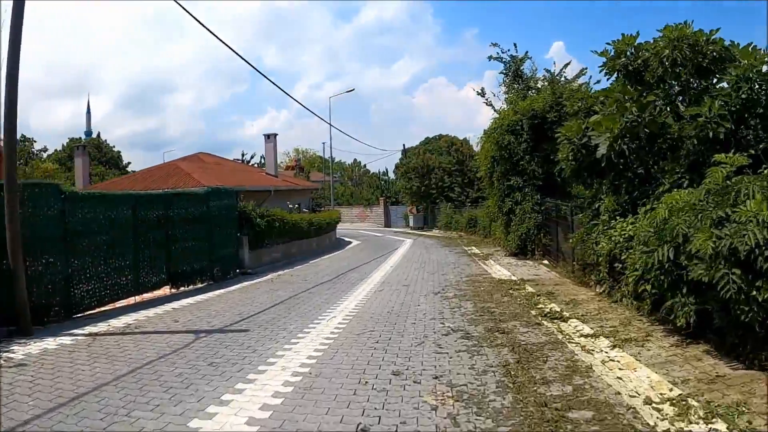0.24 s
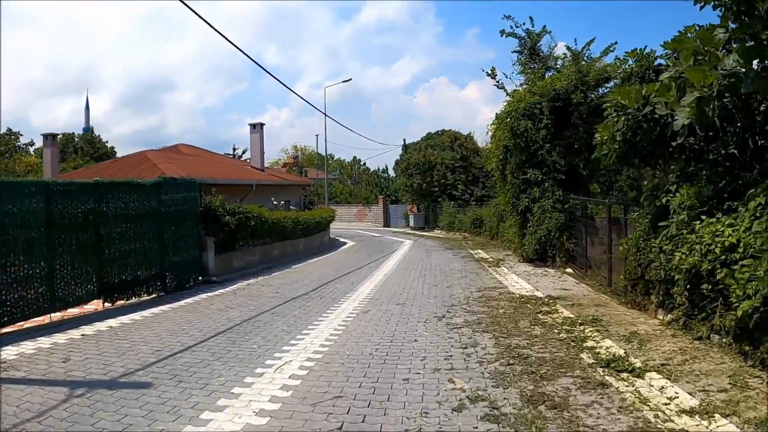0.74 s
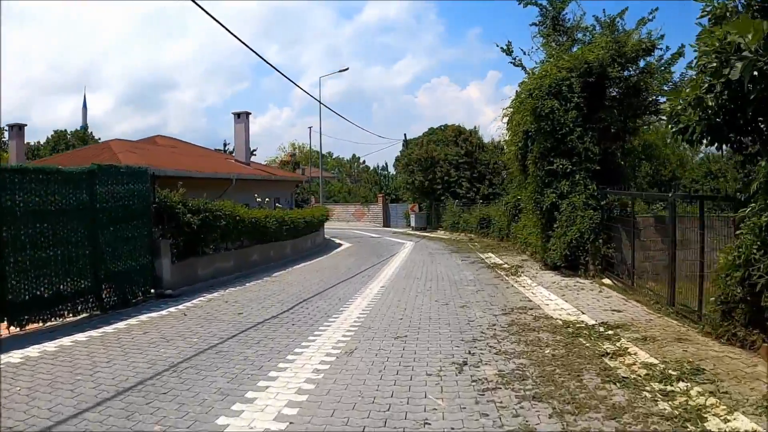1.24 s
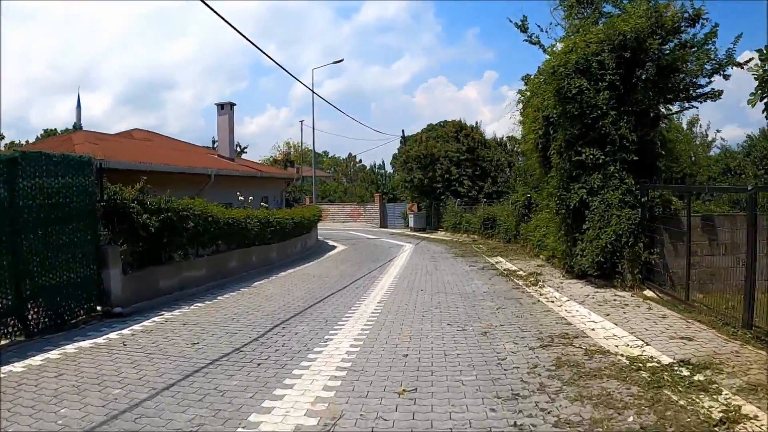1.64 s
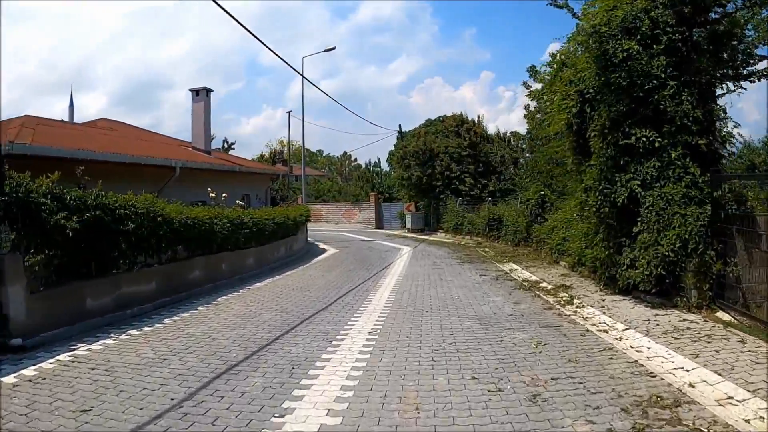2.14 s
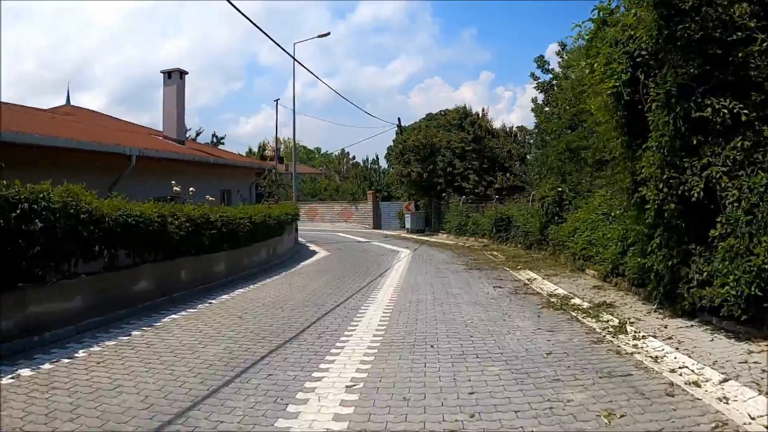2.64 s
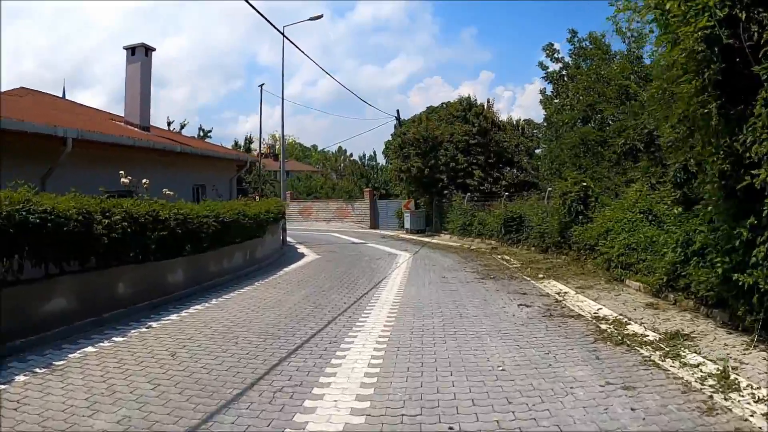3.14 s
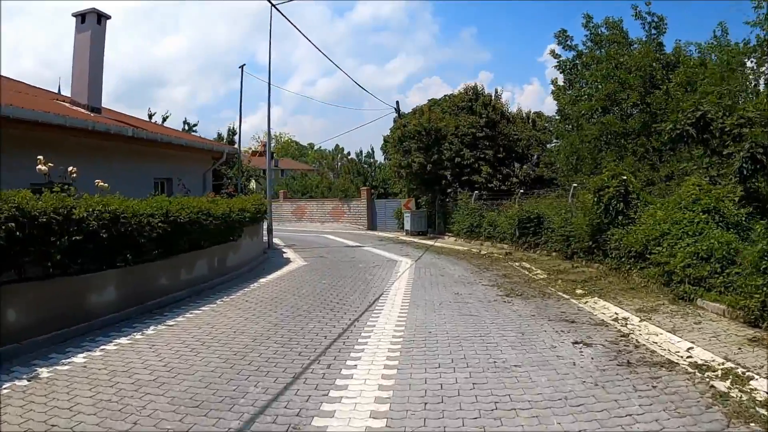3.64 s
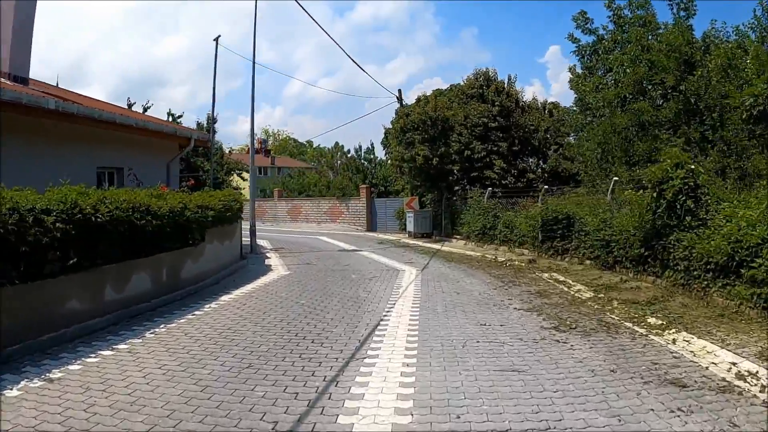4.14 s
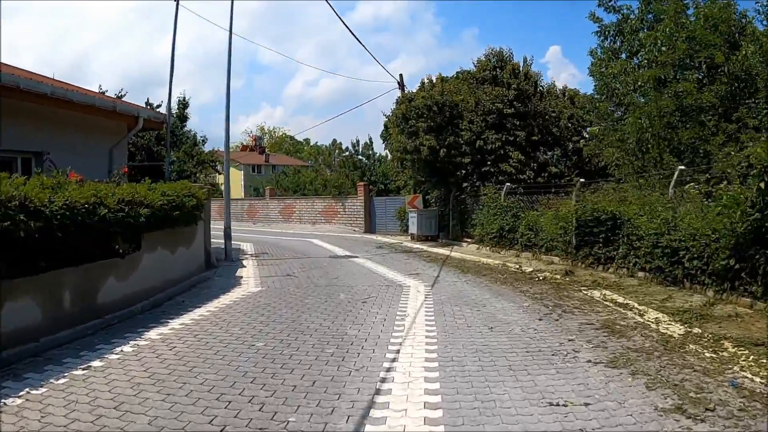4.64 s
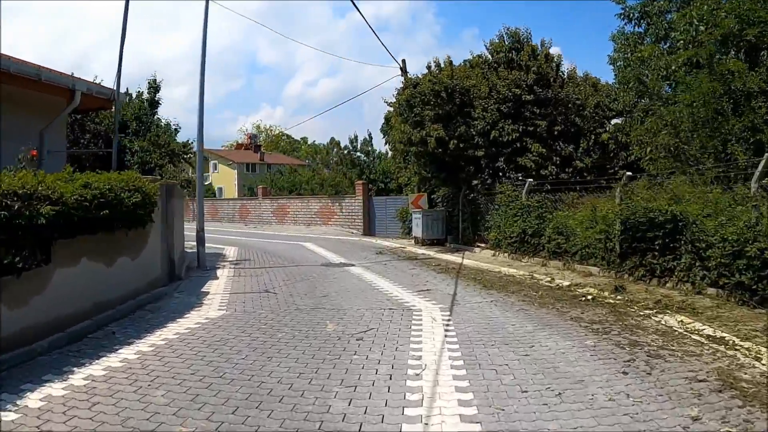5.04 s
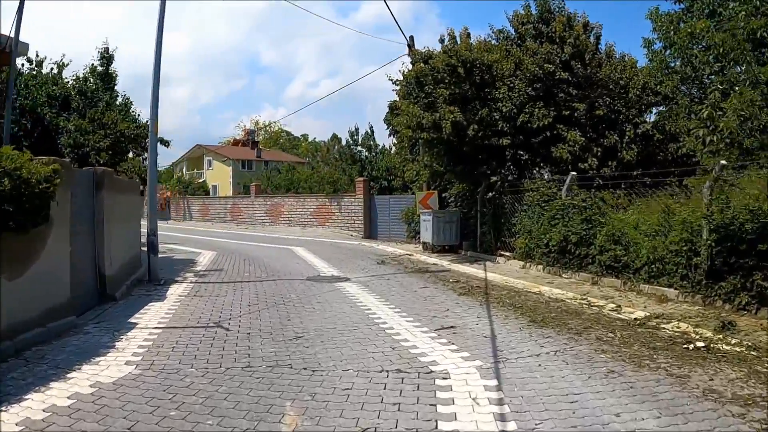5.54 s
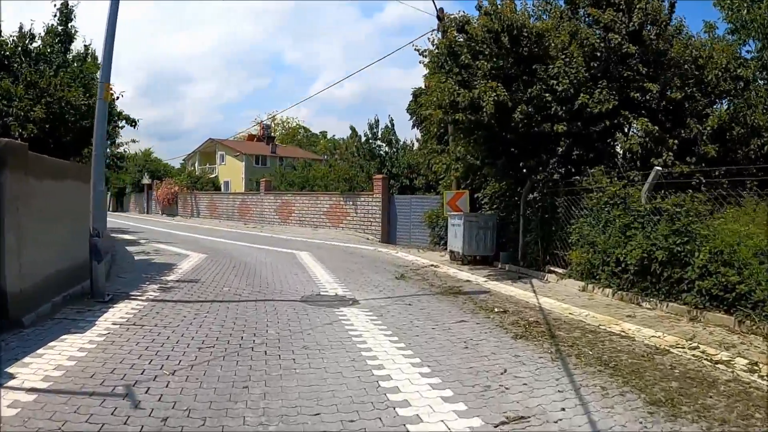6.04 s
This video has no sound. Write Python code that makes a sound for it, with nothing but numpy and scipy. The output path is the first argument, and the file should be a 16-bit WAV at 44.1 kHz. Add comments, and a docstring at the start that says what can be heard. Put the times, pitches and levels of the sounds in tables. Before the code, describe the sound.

A slow vehicle rolls along a stone-paved village street, heard from inside. The engine hums at a steady speed beneath a deep tyre rumble and the bouncing of the body. Loose trim knocks and ticks among dull thuds and gritty crunches, easing in the middle and growing busier later. Sparrows chirp very faintly outside. Near the end something rubs with a brief throbbing squeal.

```python
"""Slow ride over village paving

Inside a slow vehicle, the engine hums at a steady speed under the rumble of tyres on stone joints.
The body bounces and thuds, loose trim knocks and ticks, with gritty crunches in between. Sparrows
chirp outside, and near the bend something rubs, sticking and slipping so that it sings in throbs."""
import sys
import numpy as np
from scipy import signal
from scipy.fft import rfft, irfft
from scipy.io import wavfile
from scipy.ndimage import uniform_filter1d

SR = 44100
rng = np.random.default_rng(int(sys.argv[2]) if len(sys.argv) > 2 else 0)


def inscribe(sig):
    """Save sig as 16-bit PCM at rate SR to the path in sys.argv[1].

    A 1-D sig is mono; a 2-D sig holds one channel per row.
    Samples are clipped to [-1, 1] before scaling.
    """
    pcm = np.round(np.clip(np.atleast_2d(sig).T, -1, 1) * 32767)
    wavfile.write(sys.argv[1], SR, pcm.astype(np.int16))


N = 276948
TIME = np.arange(N) / SR


def gain_of(db):
    """Decibels to a factor."""
    return 10 ** (np.asarray(db) / 20)


def unit_rms(x):
    """Scales to rms 1."""
    return x / np.sqrt(np.mean(x ** 2) + 1e-20)


def peak_at(db, x):
    """Scales to a peak level."""
    return gain_of(db) * x / abs(x).max()


def curves(rows, t=TIME):
    """The columns of a table as fader moves: straight lines in time."""
    s, *columns = np.transpose(rows)
    return [np.interp(t, s, c) for c in columns]


def add(mix, s, sound):
    """Lays a sound into the mix at s seconds."""
    part = mix[round(s * SR):][:len(sound)]
    part += sound[:len(part)]


def wander(top_hz):
    """A random drift of rms 1, moving at rates up to top_hz."""
    t, rates = TIME[::64], np.geomspace(top_hz / 12, top_hz, 12)
    drift = sum(np.sin(2 * np.pi * (f * t + rng.random())) / np.sqrt(f) for f in rates)
    return np.interp(TIME, t, unit_rms(drift))


def coloured(x, eq):
    """Applies an EQ curve, cuts all beyond its ends and scales to rms 1."""
    hz = np.fft.rfftfreq(N, 1 / SR)
    f, db = np.transpose(eq)
    shape = gain_of(np.interp(np.log(hz + 1), np.log(f + 1), db)) * (hz > f[0]) * (hz < f[-1])
    return unit_rms(irfft(rfft(x) * shape, N))


def swell(s, length):
    """One smooth rise and fall centred on s."""
    return np.cos(np.pi * np.clip((TIME - s) / length, -.5, .5)) ** 2


def ring(hz, t, t60):
    """One mode, dying by 60 dB in t60 seconds."""
    return gain_of(-60 * t / t60) * np.sin(2 * np.pi * hz * t)


# sparrow calls: t/s, length/s, start f/Hz, middle f/Hz, end f/Hz, fundamental/dB, octave/dB
CHIRPS = [(.43, 0.016, 4770, 4330, 3900, -72, -99), (1.91, 0.048, 3980, 3850, 3700, -88, -89),
          (2.243, .02, 3900, 3800, 3750, -82, -86), (2.258, 0.046, 3010, 2950, 2930, -85, -84),
          (2.263, .013, 3450, 3420, 3450, -93, -82), (2.3, 0.015, 3730, 3980, 4250, -71.5, -96),
          (2.302, 0.038, 3000, 2940, 2900, -89, -87), (3.129, 0.12, 4900, 4630, 4480, -85, -115),
          (3.262, 0.014, 3200, 3700, 4350, -92, -85), (3.276, .014, 4800, 4900, 4880, -88, -90),
          (3.288, .012, 4500, 3930, 3500, -90, -80), (3.298, 0.012, 3700, 3750, 3350, -79, -77),
          (3.309, 0.011, 3350, 3420, 3600, -86, -71), (3.312, 0.0099, 3880, 4000, 4300, -95, -86),
          (3.322, .014, 3500, 3920, 4200, -90, -83), (3.337, 0.017, 2900, 3150, 3700, -80, -82),
          (3.648, 0.024, 2900, 3320, 4680, -88, -82), (3.661, 0.024, 4650, 5020, 4570, -71.5, -91),
          (3.682, 0.022, 4000, 3860, 3830, -75.5, -84), (3.696, 0.021, 3470, 3130, 3450, -81, -68.5),
          (3.718, .03, 3150, 2900, 3470, -91, -82), (3.73, 0.034, 2770, 3320, 4100, -72.5, -89),
          (3.752, .012, 4000, 3600, 3100, -76, -99), (3.94, 0.036, 6030, 5670, 5300, -85, -99)]


def sparrows():
    """Gliding whistles with overtones, slightly hoarse, smeared by echoes off the walls."""
    out = np.zeros(N)
    for s, length, *glide_hz, first_db, octave_db in CHIRPS:
        u = np.linspace(0, 1, round(length * SR))
        hoarse = 1 + .17 * uniform_filter1d(rng.standard_normal(len(u)), 30)
        phase = 2 * np.pi * np.cumsum(np.interp(u, (0, .5, 1), glide_hz) * hoarse) / SR
        overtones = np.sin(2 * phase) + gain_of(-19) * np.sin(3 * phase)
        tone = gain_of(first_db) * np.sin(phase) + gain_of(octave_db) * overtones
        add(out, s, np.sqrt(2) * tone * np.sin(np.pi * u) ** 0.52)
    t, echo_t60_s = np.arange(5000) / SR, .12
    echoes = rng.standard_normal(len(t)) * gain_of(-60 * t / echo_t60_s)
    return out + gain_of(-5.5) * signal.oaconvolve(out, echoes / np.linalg.norm(echoes))[:N]


# hum as the cabin colours it: t/s, level/dB of orders 7, 8, 9 and 19, offset/dB of other high orders
HUM_FADERS = [(0, -72, -50, -71, -67, 6), (.4, -73, -52.5, -68.5, -60.5, 4),
              (.8, -61, -53, -58.5, -62.5, 0.5), (1.2, -58, -55, -65, -88, -2.5),
              (1.6, -61.5, -62, -60, -68.5, -3.5), (2.0, -59, -65.5, -62.5, -73.5, 0.5),
              (2.4, -53, -61.5, -67, -85, -2), (2.8, -54.5, -60.5, -65.5, -74, -2),
              (3.2, -56.5, -57.5, -73.5, -68.5, -3.5), (3.6, -58.5, -59.5, -63, -72.5, -7.5),
              (4.0, -76, -67.5, -80, -73.5, -4), (4.4, -71.5, -76, -68.5, -90, -6.5),
              (5.2, -70.5, -71.5, -72, -84.5, -4.5), (6.28, -67.5, -70.5, -74.5, -77, -7)]
# the rest of the hum: multiple of the firing rate, level/dB before its offset
OTHER_ORDERS = [(4, -61), (5, -63.5), (6, -61.5), (10, -73.5), (12, -70), (13, -73.5), (15, -72),
                (16, -74.5), (17, -81.5), (18, -80.5), (20, -75.5), (21, -73), (22, -73.5), (23, -71.5),
                (24, -71.5), (26, -90), (27, -77), (28, -77.5), (30, -81)]


def engine():
    """Orders of a steady firing rate as clean tones, each wavering as the cabin shakes."""
    firing_hz, lead_orders, low_offset_db = 24.4, (7, 8, 9, 19), -4
    *lead_db, high_offset_db = curves(HUM_FADERS)
    orders = list(zip(lead_orders, lead_db))
    orders += [(k, db + (high_offset_db if k > 7 else low_offset_db)) for k, db in OTHER_ORDERS]
    turns = firing_hz * TIME + .011 * wander(9)
    out = np.zeros(N)
    for order, db in orders:
        flutter_db = 2.6 * wander(22)
        swell_db = (1.2 if order in lead_orders else 2.4) * wander(4)
        out += gain_of(db + flutter_db + swell_db) * np.sin(2 * np.pi * (order * turns + rng.random()))
    return np.sqrt(2) * out


# road bed: t/s, then level/dB of shake (before trim), drum, roar, dull rattle, bright rattle, hiss
ROAD_FADERS = [(0, -41, -49, -55.5, -65, -70, -72.5), (.3, -53, -53, -64.5, -65, -70.5, -72.5),
               (.55, -43, -49.5, -60.5, -67, -75.5, -74), (.84, -43.5, -43.5, -63, -66.5, -71, -71),
               (1.0, -43, -47, -65.5, -70, -72, -75), (1.38, -48.5, -53, -63, -70.5, -77.5, -77.5),
               (1.9, -49, -48, -64, -71.5, -78, -80.5), (2.6, -41, -49, -65, -71, -78.5, -79.5),
               (3.2, -42, -48.5, -65, -74.5, -82.5, -80.5), (3.6, -43, -52.5, -64, -73.5, -84, -80),
               (3.92, -41.5, -46, -64, -76, -79, -79), (4.25, -44, -44.5, -60, -73.5, -81.5, -81),
               (4.58, -47, -49.5, -63.5, -72, -79.5, -81), (4.9, -40, -44.5, -60, -72.5, -78, -78),
               (5.25, -42, -50, -61, -71, -73.5, -74), (5.5, -42.5, -41.5, -60, -77, -74.5, -78),
               (5.8, -41, -47, -61.5, -74.5, -81, -79.5), (6.1, -43, -46, -66.5, -79, -81.5, -79.5),
               (6.28, -36, -54, -58.5, -72, -71.5, -80.5)]
# bumps in the paving: centre t/s, length/s, body ring level/dB, tyre drum level/dB, ring f/Hz
BUMPS = [(0, 0.12, -54, -68, 45.0), (0.242, 0.16, -38, -43.5, 45.1), (0.425, 0.21, -33.5, -46, 43.96),
         (0.594, 0.07, -37.5, -53, 44.26), (0.753, 0.16, -39.5, -52.5, 45.2),
         (0.898, 0.26, -36, -51, 40.96), (1.093, 0.26, -34.5, -40, 44.7), (1.21, 0.12, -31, -43, 38.02),
         (1.328, 0.11, -42.5, -47, 44.0), (1.498, 0.21, -39.5, -43.5, 36.0),
         (1.698, 0.26, -38.5, -43, 40.0), (1.897, 0.25, -39.5, -55, 39.0), (2.048, 0.11, -39, -50, 45.04),
         (2.219, 0.1, -37.5, -51, 46.2), (2.368, 0.14, -45, -43.5, 44.05), (2.82, 0.13, -39.5, -60, 45.0),
         (3, 0.22, -51, -42, 44.96), (3.347, 0.28, -41, -47, 50.6), (3.478, 0.17, -45.5, -46.5, 39.86),
         (3.663, 0.17, -40.5, -46.5, 30.93), (4.072, 0.4, -40, -42, 54.26), (4.399, 0.3, -35, -42, 37.98),
         (4.694, 0.2, -36, -44.5, 37.24), (4.789, 0.1, -38, -49, 24.07), (4.931, 0.19, -41, -42, 30.07),
         (5.055, 0.12, -45, -39.5, 41.85), (5.144, 0.057, -39, -39.5, 35.0),
         (5.219, 0.19, -51, -40.5, 65.2), (5.395, 0.21, -44, -45.5, 50.16),
         (5.559, 0.047, -38.5, -56, 40.74), (5.645, 0.043, -39.5, -57, 30.0),
         (5.993, 0.21, -39, -42.5, 41.1), (6.13, 0.054, -44, -64, 48.0), (6.27, 0.21, -36, -42, 38)]
# EQ of the deep shake: f/Hz, gain/dB
SHAKE_EQ = [(14, -24), (22, -9.5), (30, -1), (36, -2.5), (42, 4.5), (49, -4.5), (60, -6), (70, -5.5),
            (90, -35)]


def body_shake():
    """The body bounces on its tyres: compressed sub rumble, and a low wavering ring at each bump."""
    rumble = coloured(rng.standard_normal(N), SHAKE_EQ)
    compressed = rumble / (uniform_filter1d(rumble ** 2, 2600) + 0.047) ** 0.38
    out = gain_of(curves(ROAD_FADERS)[0] - 0.5) * unit_rms(compressed)
    waver = 0.17 * wander(8.3)
    for s, length, ring_db, _, hz in BUMPS:
        tone = np.sin(2 * np.pi * (hz * TIME + waver + rng.random()))
        out += np.sqrt(2) * gain_of(ring_db) * swell(s, length) * tone
    return out


# EQs of tyre drum, cabin roar, dull rattle, bright rattle and hiss: f/Hz, gain/dB
DRUM_EQ = [(50, -31), (65, 1.5), (125, -2.5), (150, -13), (215, -18.5), (250, -26), (300, -48.5)]
ROAR_EQ = [(130, -29.5), (220, -1), (334, -8.5), (383, -5), (482, -13), (565, -10), (795, -19.5),
           (900, -29.5), (1170, -60.5), (1980, -120)]
DULL_EQ = [(470, -42), (800, -10), (950, -3.5), (1040, -5.5), (1140, -1), (1550, -7.5), (2020, -41),
           (3410, -120)]
BRIGHT_EQ = [(910, -26.5), (1550, -4), (1690, 1), (1780, 3), (1980, 0.5), (2500, -9.5), (3250, -39.5),
             (5500, -120)]
HISS_EQ = [(1350, -32), (2300, -3.5), (2530, -7), (3170, -4.5), (5390, -12), (5880, -13), (6860, -17),
           (7700, -17), (10800, -32), (13100, -32.5), (15600, -37)]


def road_noise():
    """Tyres on stone: bumps swell the drum and roar, joints jolt all layers above the drum together."""
    _, drum_db, roar_db, dull_db, bright_db, hiss_db = curves(ROAD_FADERS)
    bumps = sum(gain_of(db) * swell(s, length) for s, length, _, db, _ in BUMPS)
    joints = stone_joints(per_s=160, spread_db=1.5, smear_s=0.008)
    noise = rng.standard_normal((5, N))
    drum = np.hypot(gain_of(drum_db), bumps) * coloured(noise[0], DRUM_EQ)
    roar_gain = np.hypot(gain_of(roar_db), gain_of(-18.5) * bumps)
    roar = roar_gain * coloured(noise[1] + 0.33 * joints, ROAR_EQ)
    dull = gain_of(dull_db) * coloured(noise[2] + 0.45 * joints, DULL_EQ)
    bright = gain_of(bright_db) * coloured(noise[3] + 0.55 * joints, BRIGHT_EQ)
    hiss = gain_of(hiss_db) * coloured(noise[4] + 0.88 * joints, HISS_EQ)
    return drum + roar + dull + bright + hiss


def stone_joints(per_s, spread_db, smear_s):
    """Flickering noise of rms 1 that flares at each random jolt."""
    sizes = gain_of(spread_db * np.minimum(rng.exponential(1, N), 4))
    jolts = sizes * (rng.random(N) < per_s / SR)
    envelope = signal.oaconvolve(jolts, np.exp(-np.arange(2000) / SR / smear_s))[:N]
    return unit_rms(envelope * rng.standard_normal(N))


# crunches and rustles: t/s, length/s, centre f/Hz, width/Hz, rms level/dB before the fades
CRUNCHES = [(0, 0.48, 663, 250, -65), (0.027, 0.24, 1430, 500, -70), (0.498, 0.24, 1280, 250, -67.5),
            (0.629, 0.17, 1330, 220, -65), (0.673, 0.022, 3300, 1500, -65), (.557, .015, 3600, 1800, -72),
            (0.798, 0.018, 3700, 1500, -67), (.828, .1, 3640, 1500, -78), (0.799, 0.29, 1305, 250, -68.5),
            (1.175, 0.037, 1270, 500, -60.5), (1.176, 0.0061, 8450, 9000, -69.5),
            (1.17, 0.097, 7500, 5000, -84), (1.308, 0.069, 2630, 900, -78), (2.218, 0.17, 5500, 4500, -85),
            (2.406, 0.26, 4350, 1800, -83.5), (2.939, 0.018, 2100, 900, -62),
            (2.935, 0.013, 3200, 1000, -65), (2.938, 0.008, 760, 260, -55), (2.934, 0.034, 6000, 5000, -84),
            (2.942, 0.026, 400, 250, -57), (2.953, 0.042, 298, 200, -58),
            (2.999, 0.0053, 3000, 2400, -69.5), (3.219, .18, 4500, 3500, -82.5),
            (3.64, 0.13, 4000, 4000, -79.5), (3.835, 0.0055, 1780, 1000, -62),
            (3.87, 0.0053, 1800, 1210, -64), (3.876, 0.3, 1180, 350, -68), (3.795, 0.38, 3150, 1300, -80),
            (4.746, 0.04, 3200, 1800, -72.5), (4.671, 0.063, 1390, 500, -84),
            (4.961, 0.011, 3300, 1600, -61), (4.989, 0.022, 2120, 600, -69),
            (5.041, 0.0054, 5200, 2500, -74), (5.054, 0.02, 5300, 900, -78),
            (5.081, 0.017, 4200, 3000, -69.5), (5.104, .014, 5500, 1200, -77),
            (5.189, 0.016, 3400, 700, -64), (5.226, 0.03, 3730, 2500, -65), (5.258, 0.08, 1840, 450, -71),
            (5.354, 0.054, 2480, 1200, -65.5), (5.472, 0.057, 5300, 3000, -76),
            (5.682, 0.0043, 7900, 5000, -75), (5.677, 0.073, 2980, 1800, -72.5),
            (5.819, 0.029, 2910, 2220, -60.5), (5.82, 0.045, 6000, 4000, -75),
            (5.868, 0.046, 2980, 2220, -66.5), (5.869, 0.12, 6200, 4000, -81.5),
            (5.889, 0.094, 1416, 300, -60.5), (5.954, 0.039, 690, 200, -54.5),
            (5.934, 0.032, 2200, 2400, -66)]


def crunches():
    """Dense grit of uneven grain size through one broad resonance; long rustles are grainier."""
    out = np.zeros(N)
    for s, length, hz, width, db in CRUNCHES:
        noise, size = rng.standard_normal((2, 30000))[:, :round(length * SR)]
        grain_db = 1.5 if length < 0.12 else 3
        grit = noise * gain_of(grain_db * unit_rms(uniform_filter1d(size, 90)))
        edges_hz = np.clip([hz - width / 2, hz + width / 2], 100, 14000)
        grit = signal.sosfilt(signal.butter(3, edges_hz, "band", fs=SR, output="sos"), grit)
        add(out, s, gain_of(db) * unit_rms(grit) * signal.windows.tukey(len(grit), .6))
    return out


# thin ticks: t/s, peak level/dB, f/Hz
TICKS = [(0.372, -58, 3330), (.678, -52, 3370), (.8026, -52, 3670), (.8565, -57, 3500),
         (1.3556, -56.5, 3000), (4.1, -56.5, 4100), (4.2328, -63, 4400), (4.3534, -61, 3870),
         (4.3959, -61, 4000), (4.444, -58.5, 4170), (4.551, -57, 4030), (4.5955, -63, 4100),
         (4.6494, -58, 4240), (4.6945, -50.5, 4120), (4.787, -58, 3900), (4.838, -59, 4040),
         (4.867, -56, 4000), (4.888, -52.5, 3960), (4.9356, -48.5, 3860), (5.151, -54, 4150),
         (5.201, -51, 3770), (5.214, -45.5, 3160), (5.3034, -55, 4000), (5.365, -51, 2960),
         (5.4151, -60, 4390), (5.463, -52, 4200), (5.543, -56.5, 4200), (5.6087, -63, 3220),
         (5.655, -52, 4080), (5.7005, -47, 4170), (5.753, -58.5, 4320), (5.878, -52, 3060),
         (5.933, -55, 3420), (6.0044, -58, 3920), (6.0498, -54.5, 4120)]


def trim_ticks():
    """Tiny hard contacts: two modes, each time a little different, gone in a few milliseconds."""
    out, t = np.zeros(N), np.arange(600) / SR
    attack = (1 - np.exp(-t / 0.0002)) ** 2
    faint_tick = (rng.uniform(4.5, 4.7), rng.uniform(-76, -70), 3580 * rng.uniform(.86, 1.14))
    for s, db, hz in TICKS + [faint_tick]:
        low = rng.uniform(.3, .8) * ring(rng.uniform(.56, .68) * hz, t, t60=0.0076)
        high = ring(hz, t, t60=rng.uniform(.004, .008))
        add(out, s, peak_at(db, (low + high) * attack))
    return out


# blows in the body: t/s, peak level/dB, f/Hz
THUDS = [(1.041, -40, 248), (1.066, -40, 150), (1.078, -51, 398), (1.187, -50, 380), (1.231, -33, 130),
         (1.5, -48, 231), (2.941, -47, 347), (2.956, -40.5, 212), (2.973, -53, 470), (2.996, -45, 243),
         (4.171, -54, 371), (4.348, -54, 600), (4.697, -39, 270), (4.937, -40.5, 306), (5.243, -37.5, 335),
         (5.468, -48, 323), (5.656, -40.5, 264), (5.703, -37.5, 366), (5.729, -38.5, 260)]


def body_thuds():
    """Dull blows: one damped low mode with a soft attack."""
    out, t = np.zeros(N), np.arange(4000) / SR
    attack = 1 - np.exp(-t / 0.0012)
    for s, db, hz in THUDS:
        add(out, s, peak_at(db, ring(hz, t, t60=0.02) * attack))
    return out


# throbs of the rubbing tone: t/s, length/s, crest level/dB
THROBS = [(5.777, 0.11, -58), (5.818, 0.079, -56), (5.87, 0.035, -43.5), (5.893, 0.064, -41),
          (5.959, 0.05, -39.5), (6.002, 0.042, -49), (6.039, 0.042, -41), (6.083, 0.052, -47),
          (6.131, 0.042, -52), (6.168, .035, -59.5), (6.191, 0.041, -47.5), (6.219, 0.023, -58),
          (6.235, 0.052, -53)]
# its overtones: order, held level/dB, fade/(dB per s)
RUB_OVERTONES = [(2, -74, 90), (3, -67, 300)]


def rubbing():
    """A trembling stick-slip tone in throbs; overtones rise with the first hard grip, hold and fade."""
    pitch_hz, grip_s, let_go_s, rise_db_per_s = 704.5, 5.875, 5.99, 898
    grip = np.zeros(N)
    for s, length, db in THROBS:
        n = len(np.arange(s, s + length, 1 / SR))
        rasp = unit_rms(signal.oaconvolve(rng.standard_normal(6000), np.hanning(300), "valid"))[:n]
        arch = np.sin(np.pi * np.linspace(0, 1, n)) ** 0.5 * signal.windows.tukey(n, .15)
        add(grip, s, gain_of(db) * arch * (1 + 0.094 * rasp))
    phase = 2 * np.pi * (pitch_hz * TIME + .04 * wander(60))
    out = grip * np.sin(phase)
    before_s, after_s = np.maximum(grip_s - TIME, 0), np.maximum(TIME - let_go_s, 0)
    for order, db, fade_db_per_s in RUB_OVERTONES:
        level_db = db - rise_db_per_s * before_s - fade_db_per_s * after_s + 3 * wander(90)
        out += gain_of(level_db) * np.sin(order * phase)
    return out


def small_knocks(per_s, hollow_db):
    """Rows of weak knocks at random moments, riding the level of the dull rattle."""
    when, size, pitch = rng.random((round(per_s * N / SR), 3)).T
    times = when * N / SR
    peak_db = curves(ROAD_FADERS, times)[3] + np.interp(size, (0, 1), (-6, 2))
    hz = np.interp(pitch, (0, 1), (1120, 1780))
    return [(*knock, hollow_db) for knock in zip(times, peak_db, hz)]


# loose trim knocking: t/s, trim peak level/dB, f/Hz, hollow panel against the trim/dB
KNOCKS = [(0.121, -50, 1500, -15), (.235, -50.5, 1290, -11), (0.362, -61, 1260, -8), (.497, -63, 1410, -14),
          (.524, -48, 1210, -6), (0.56, -50.5, 1370, -15), (.589, -63, 1310, -15), (0.623, -60, 1240, -13),
          (0.662, -44.5, 1336, -23), (0.678, -51, 1330, -19), (0.708, -53, 1500, -20),
          (.719, -47, 1210, -4), (.747, -46, 1450, -17), (0.805, -46, 1325, -15), (.833, -50.5, 1710, -24),
          (.856, -58, 1410, -15), (0.8747, -49, 1280, -17), (.886, -50, 1200, -12), (0.904, -53, 1460, -4),
          (.917, -50.5, 1340, -11), (0.94, -55, 1340, -13), (.955, -60, 1290, -14), (1.003, -54, 1330, -18),
          (1.183, -46, 1230, -21), (1.244, -58, 1310, -15), (1.304, -53, 1390, -18),
          (1.512, -53.5, 1250, -2), (1.5786, -41, 1310, -27), (1.717, -66, 1570, -13),
          (1.892, -54, 990, -11), (1.893, -55, 1490, -25), (2.9334, -42, 2170, -5),
          (2.9385, -50, 2250, 9.5), (3.0015, -50.5, 1026, -7), (3.8335, -56, 1720, -25),
          (3.862, -59, 1750, -22), (4.3454, -42.5, 1130, -20), (4.454, -59.5, 1530, -21),
          (4.683, -57, 1390, -18), (4.727, -61, 1350, -20), (4.737, -61, 1350, -16),
          (4.758, -56, 1760, -14), (4.79, -54, 1350, -1), (4.805, -55, 1300, -9), (4.958, -43.5, 1760, -29),
          (4.9653, -52, 1830, -27), (4.979, -58, 2420, -21), (4.993, -59, 2090, -20),
          (5.008, -52, 2100, -11), (5.0415, -44, 1780, -12), (5.0903, -39, 1700, -23),
          (5.107, -56, 1700, -20), (5.146, -51.5, 2030, -20), (5.192, -52, 1230, -2),
          (5.21, -49, 1280, -16), (5.239, -46, 1830, -29), (5.261, -47, 1710, -22), (5.286, -52, 1610, -18),
          (5.296, -61, 1850, -15), (5.3323, -53, 1840, -20), (5.371, -50, 1240, -19),
          (5.384, -47, 1870, -28), (5.484, -48, 1765, -25), (5.715, -55, 1840, -22),
          (5.749, -54, 1610, -20), (5.8199, -46, 1530, -31), (5.828, -48, 2190, -28),
          (5.832, -50, 1300, -26), (5.8706, -44, 2170, -25), (5.896, -47, 1400, -10),
          (5.94, -42, 1510, -14), (5.94, -48, 1730, -24), (5.953, -51, 1380, -21),
          (5.967, -50.5, 1420, -11.5), (6.0217, -55.5, 1900, -14), (6.071, -54.5, 1780, -25),
          (6.1566, -58, 1660, -21)]
# modes of the trim: ratio to the knock's f, gain/dB
TRIM_MODES = [(1.014, 5), (1.27, -8), (0.877, -3.5), (2.1, -15.5)]
# modes of the hollow panel: f/Hz, gain/dB
PANEL_MODES = [(690, 0), (850, 0)]


def trim_knocks():
    """A blow and a few bounces ring the trim and a hollow panel, with a dry scrape on top."""
    out, n = np.zeros(N), 2000
    t = np.arange(n) / SR
    attack = 1 - np.exp(-t / .0006)
    mid_hz = 1750  # lower knocks ring longer and scrape less
    scrape_ceiling_db, full_scrape_knock_db = -62.5, -43
    scrape_band = signal.butter(3, [2500, 5800], "band", fs=SR, output="sos")
    panel_ring = attack * sum(gain_of(g) * ring(f, t, t60=.026) for f, g in PANEL_MODES)
    for s, db, hz, hollow_db in KNOCKS + small_knocks(per_s=3, hollow_db=-15.5):
        noise = rng.standard_normal(n)
        when, size = rng.random((2, 6))
        drive = np.zeros(n)
        drive[80] = 0.61  # the first blow
        drive[((.0022 + .006 * when) * SR).astype(int)] = (size - .5) * .8  # its bounces
        drive = signal.convolve(drive, np.hanning(15))[:n]  # soft contacts: no fizz at the top
        t60 = 0.012 * (mid_hz / hz) ** 1.2
        trim_ring = attack * sum(gain_of(g) * ring(hz * k, t, t60) for k, g in TRIM_MODES)
        trim = peak_at(db, signal.fftconvolve(drive, trim_ring)[:n])
        panel = peak_at(db + hollow_db, signal.fftconvolve(drive, panel_ring)[:n])
        scrape = signal.sosfilt(scrape_band, noise * uniform_filter1d(abs(drive), 60))
        softer_db = min(db - full_scrape_knock_db, 0) + 16 * min(np.log2(hz / mid_hz), 0)
        add(out, s, trim + panel + peak_at(scrape_ceiling_db + softer_db, scrape))
    return out


def scene():
    """The mono cabin mix: a bed of engine and road, with the short sounds on top."""
    bed = engine() + body_shake() + road_noise()
    return (bed + trim_knocks() + crunches() + trim_ticks() + body_thuds() + rubbing() + sparrows())[None]


def record(dry):
    """A steep high cut at 15.5 kHz."""
    high_cut = signal.firwin(511, 15500, window=("kaiser", 9), fs=SR)
    padded = np.pad(dry, ((0, 0), (255, 255)), "edge")
    return signal.oaconvolve(padded, high_cut[None], "valid")


dry = scene()
out = record(dry)
inscribe(out)
```